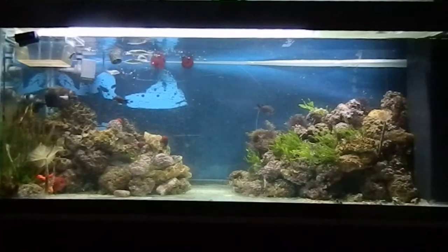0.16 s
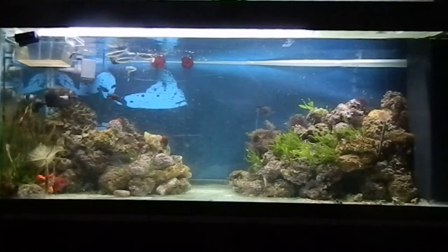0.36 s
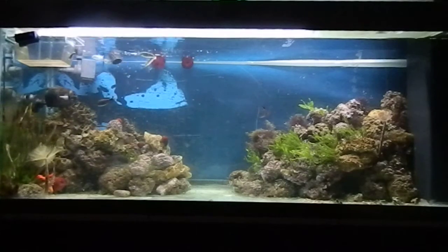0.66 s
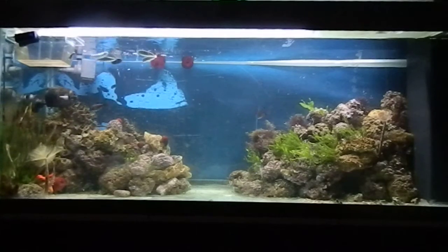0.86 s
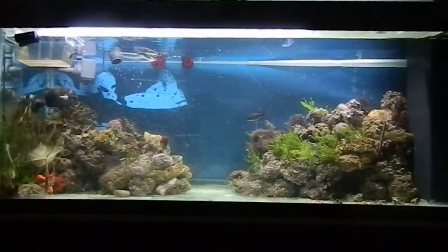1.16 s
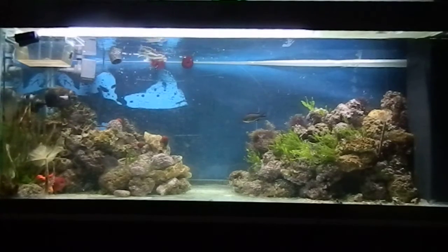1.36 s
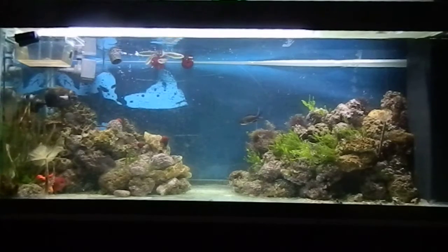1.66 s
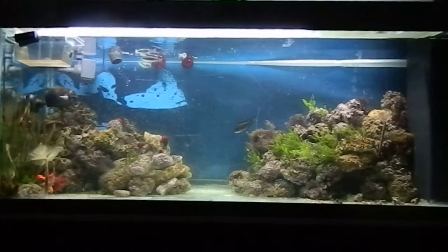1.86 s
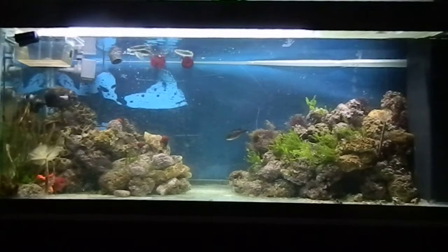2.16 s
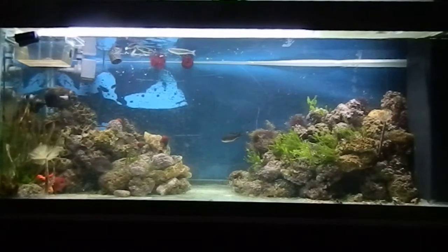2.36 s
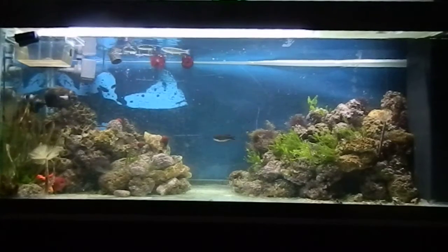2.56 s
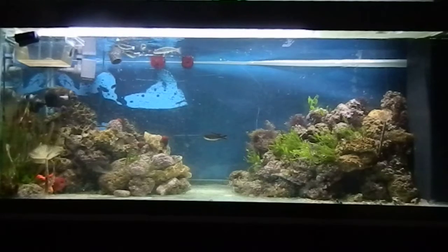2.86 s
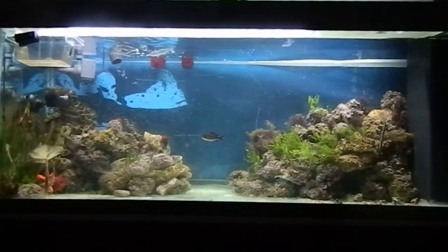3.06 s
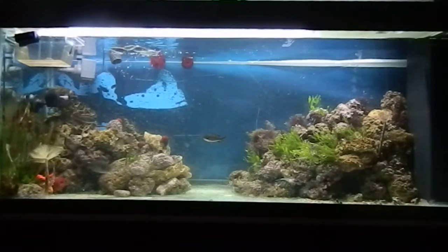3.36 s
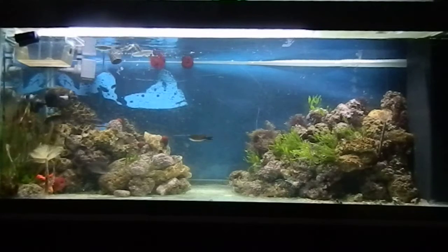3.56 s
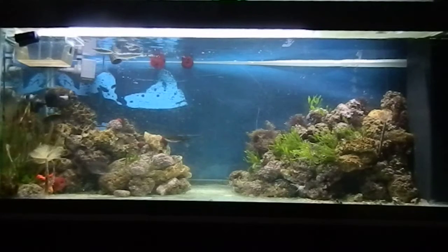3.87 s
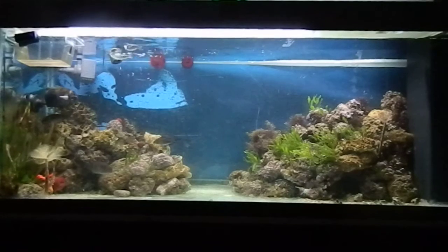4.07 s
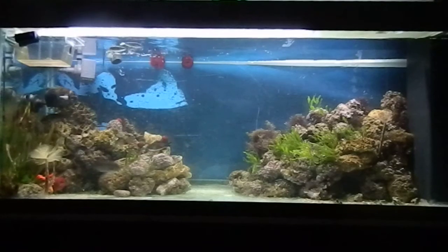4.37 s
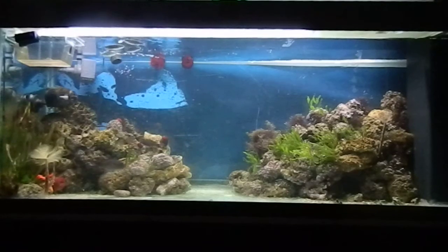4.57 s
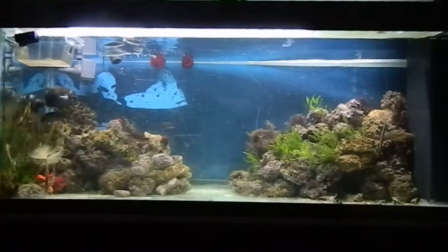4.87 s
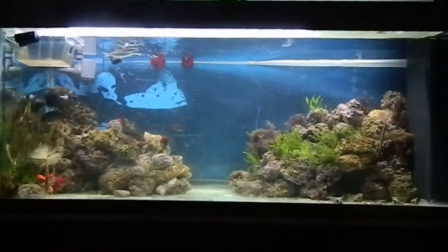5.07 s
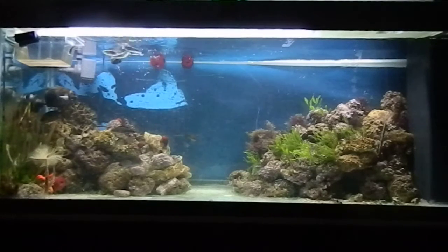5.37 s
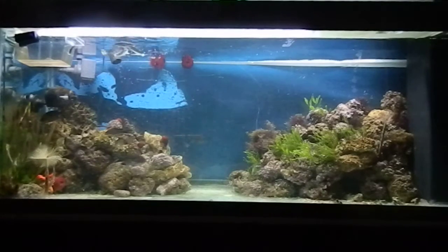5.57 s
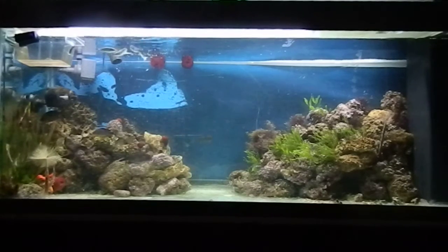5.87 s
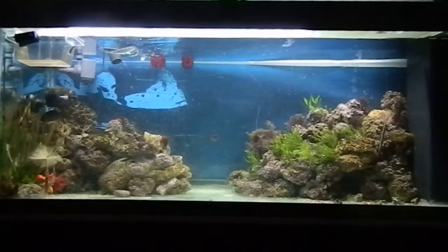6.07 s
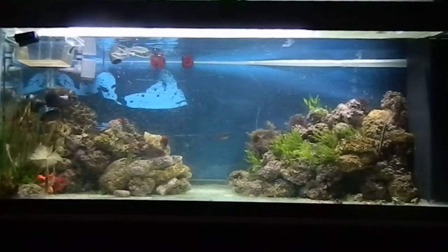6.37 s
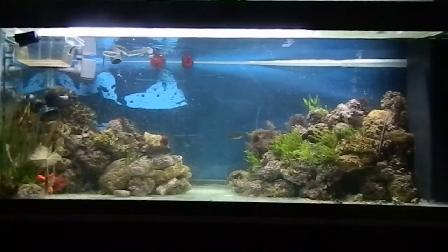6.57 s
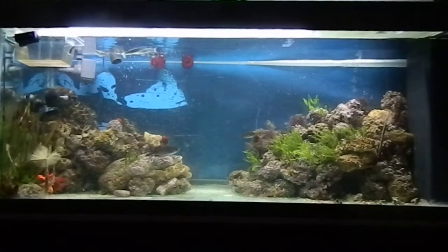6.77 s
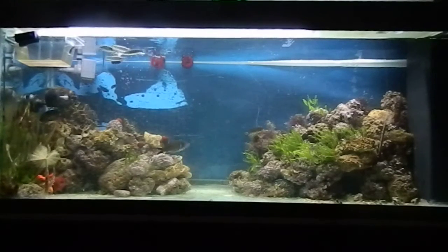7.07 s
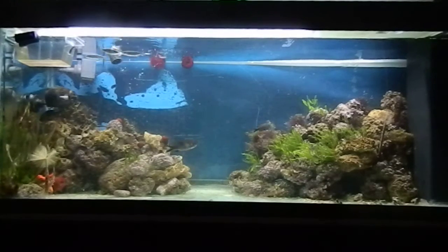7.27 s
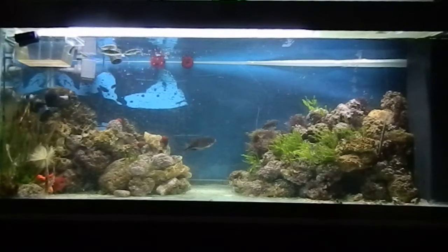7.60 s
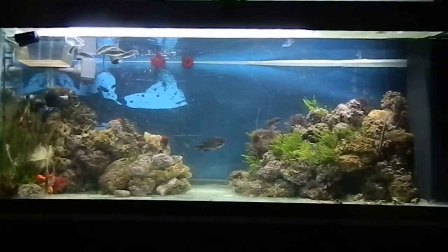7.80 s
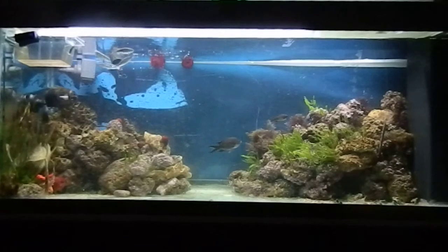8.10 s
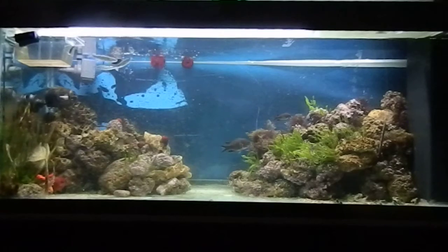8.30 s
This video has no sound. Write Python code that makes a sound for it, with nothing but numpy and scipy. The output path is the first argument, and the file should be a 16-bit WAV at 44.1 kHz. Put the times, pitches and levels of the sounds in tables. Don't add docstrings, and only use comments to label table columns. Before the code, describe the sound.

Close beside aquarium pumps, a strong low mains hum holds constant under quiet watery hiss, tiny valve clicks and a loose cover's late chatter.

```python
import sys
import numpy as np
from scipy import signal
from scipy.fft import rfft, irfft
from scipy.io import wavfile
from scipy.ndimage import uniform_filter1d

SR = 44100
rng = np.random.default_rng(int(sys.argv[2]) if len(sys.argv) > 2 else 0)


def field_ratio(decibels):
    return 10 ** (np.asarray(decibels, dtype=float) / 20)


def dump_mix(stems):
    frames = np.atleast_2d(stems).T
    limited = np.clip(frames, -1, 1)
    pcm = np.round(limited * 32767).astype(np.int16)
    wavfile.write(sys.argv[1], SR, pcm)


N = 372204
T = np.arange(N) / SR
F = np.maximum(np.arange(N // 2 + 1) * SR / N, 1)
MAINS_HZ = 50.005
MAINS_TURN = 2 * np.pi * MAINS_HZ * T


def level(x, db):
    return x * field_ratio(db) / np.sqrt(np.mean(x ** 2))


def over_hz(table):
    hz, value = np.transpose(table)
    return np.interp(np.log(F), np.log(hz), value)


def colour(x, gain):
    return irfft(rfft(x) * gain, N)


def ring(hz, width):
    return 1 / (1 + 1j * (F - hz ** 2 / F) / width)


def walk(rate):
    hold = int(SR / rate)
    steps = np.repeat(rng.standard_normal(N // hold + 1), hold)
    smooth = uniform_filter1d(uniform_filter1d(steps, hold), hold)[:N]
    return (smooth - smooth.mean()) / smooth.std()


def spell(start_s, length_s, attack_s, release_s):
    rise = (T - start_s) / attack_s
    fall = 1 + (start_s + length_s - T) / release_s
    share = np.clip(np.minimum(rise, fall), 0, 1)
    return np.sin(np.pi / 2 * share) ** 2


def clicks(at, size):
    at = np.clip(at, 0, N - 2)
    i = at.astype(int)
    return np.bincount(i, size * (i + 1 - at), N) + np.bincount(i + 1, size * (at - i), N)


def blows(pattern, hz, jitter_s, scatter_db):
    place, db = np.transpose(pattern)
    cycles = np.arange(int(N / SR * hz) - 1)[:, None]
    chance = rng.uniform(-0.95, 1, (len(cycles), len(place), 2))
    at = ((cycles + place) / hz + jitter_s * chance[..., 0]) * SR
    return clicks(at.ravel(), field_ratio(db + scatter_db * chance[..., 1]).ravel())


def puffs(ticks, fade_s):
    fading = signal.lfilter([1], [1, -np.exp(-1 / (fade_s * SR))], ticks)
    return fading * rng.standard_normal(N)


def shaft_repeat(amount, fade_hz):
    g = np.clip(amount, 0, .9) / (1 + (F / fade_hz) ** 4)
    return np.sqrt(1 - g ** 2) / (1 - g * np.exp(-4j * np.pi * F / MAINS_HZ))


def room(x, wet_db, t60_s):
    t = T[:SR // 2]
    tail = rng.standard_normal((2, len(t))) * np.exp(-np.log(1000) * t / t60_s) * (t > .002)
    tail *= field_ratio(wet_db) / np.sqrt(np.sum(tail ** 2, axis=1, keepdims=True))
    tail[[0, 1], [1, 0]] = 1
    return signal.fftconvolve(x[None], tail, axes=1)[:, :N]


def standing_waves(wet_db, t60_s):
    echoes = rng.standard_normal(N) * np.exp(-np.log(1000) * T / t60_s)
    echoes = rfft(echoes / np.sqrt(np.sum(echoes ** 2)))
    return np.abs(1 + field_ratio(wet_db) * echoes / np.sqrt(1 + (1800 / F) ** 4))


# centre in Hz, width in Hz, lift in dB.
CABINET_MODES = [(134, 9.3, 3.5), (229, 12, 3.5), (369, 19.6, 8.5), (429, 7.3, 5.5), (530, 8.7, -1.5),
                 (538, 8.4, 4), (794, 9.5, 3.5), (844, 32, 2.5), (893, 54, 7), (960, 7, 5), (1066, 18, 6.5),
                 (1193, 46, 3.5), (1281, 12, 7.5), (1437.5, 11.7, 10), (1687, 49, 3.5), (2050, 30, 5),
                 (2570, 32, 0.5), (2646, 36, 4), (2750, 50, 3.5), (2850, 45, 1), (3220, 87, 2),
                 (3910, 66, 0.5), (5280, 200, 2), (5810, 170, 4.5), (7350, 730, 2.5), (9300, 2200, 2)]
# centre in Hz, width in Hz, depth from 0 to 1.
ECHO_DIPS = [(3650, 200, .25), (4960, 130, .5), (5520, 130, .5), (6050, 160, .55), (6500, 200, .3),
             (7950, 500, .4)]


def cabinet_response():
    modes = np.prod([1 + (field_ratio(db) - 1) * ring(hz, width) for hz, width, db in CABINET_MODES], axis=0)
    dips = np.prod([1 - depth * ring(hz, width) for hz, width, depth in ECHO_DIPS], axis=0)
    return modes * dips * standing_waves(wet_db=-9, t60_s=.22)


# frequency in Hz, level in dB per Hz.
WATER_SPECTRUM = [(290, -33), (500, -7.5), (680, -6.5), (890, -3), (980, -5.5), (1240, -5.5), (1370, -9.5),
                  (1670, -7.5), (2400, -11.5), (3640, -14), (6000, -21.5), (9300, -26.5), (13200, -34),
                  (15700, -39)]
# frequency in Hz, level in dB per Hz.
AIR_SPECTRUM = [(20, -17), (40, -18), (65, -12), (90, -5.5), (135, -1), (200, -4), (300, -8), (450, -12.5),
                (600, -16), (800, -38)]
# frequency in Hz, likeness from 0 to 1.
PORT_LIKENESS = [(30, .8), (60, 1), (130, 1), (250, 0.53), (400, 0.45), (640, 0.81), (1410, .8),
                 (3100, 0.54), (6820, 0.51), (11000, 0.5), (15000, .05)]


def rush(cabinet):
    water = field_ratio(over_hz(WATER_SPECTRUM) - 1.0) * (F > 400)
    air = field_ratio(over_hz(AIR_SPECTRUM) + 2.0)
    clatter = np.where(F > 210, shaft_repeat(0.29, 2700.0), 1)
    shape = np.hypot(water, air) * np.abs(cabinet) * clatter
    alike = np.clip(over_hz(PORT_LIKENESS), 0, 1)
    out, swell = 0, walk(3.36)
    for octave in np.arange(4.5, 14.1, .5):
        band = np.cos(np.pi * np.clip(np.log2(F) - octave, -.5, .5)) * shape
        mid, side = rfft(rng.standard_normal((2, N)))
        pair = mid * np.sqrt(1 + alike) + side * np.sqrt(1 - alike) * np.array([[1], [-1]])
        out = out + irfft(pair * band, N) * field_ratio(.15 * swell + .5 * walk(12))
    return level(out, -43)


# start in seconds, length in seconds, level in dB.
CLAMP_FITS_HEARD = [
    (-.1, .16, -51),
    (1.75, 0.65, -56.5),
    (3.204, .2, -56.5),
    (6.32, 0.34, -51.5),
]


def clamp():
    pattern = [(.08, -1.5), (.16, -7.5), (.56, -7.5), (.64, -7)]
    ticks = blows(pattern, MAINS_HZ, jitter_s=0.00052, scatter_db=1.5)
    thin = level(colour(puffs(ticks, .002), ring(2760., 620.) ** 2), 0)
    fade_s = 0.084
    fits = sum(field_ratio(db) * spell(s, length, fade_s, fade_s) for s, length, db in CLAMP_FITS_HEARD)
    resting = field_ratio(-60 + 1.0 * walk(2.5))
    return field_ratio(-.8) * room(thin * np.maximum(fits, resting), wet_db=-6, t60_s=.1)


# centre in Hz, width in Hz, level in dB.
COVER_RINGS = [(1087, 21, -5), (1227, 29, -1), (1260, 48, -7), (1377, 60, -3.5), (1447, 47, -12),
               (1610, 120, -7.5), (1815, 62, -5), (2035, 76, -2.5), (2158, 45, -3), (2246, 90, -3)]
# multiple of the mains, level in dB against the buzz.
LOCKED_TONES = [(21, -15), (22, -11), (24, -5.5), (25, -13), (41, -13), (43, -14), (45, -14)]
# peak in seconds, lift in dB, half length in seconds.
COVER_SURGES = [
    (6.866, 3, .09),
    (6.994, 6, 0.13),
    (8.16, 4.5, .08),
]


def cover():
    start_s = 6.74
    going = spell(start_s, T[-1], .1, 1)
    surge_db = sum(db * spell(s - half, half, half, half) for s, db, half in COVER_SURGES)
    buzz_gain = going * field_ratio(-46 + 0.31 * surge_db + 0.74 * walk(8))
    rush_gain = going * field_ratio(-47 - 3 * (T - start_s) + surge_db)

    modes = sum((-1) ** k * field_ratio(db) * ring(hz, width) for k, (hz, width, db) in enumerate(COVER_RINGS))
    knocks = rng.standard_normal((2, N)) * field_ratio(.8 * walk(30))
    buzz = level(colour(knocks[0], modes * shaft_repeat(0.56, 2400.0)), -1.3)
    middle = level(colour(knocks[1], ring(1490.0, 790.0) ** 2 * shaft_repeat(0.28, 2600.)), 0)
    chatter = room(buzz * buzz_gain + middle * rush_gain, wet_db=-7, t60_s=0.21) * field_ratio(0.3)

    settled = spell(7.1, T[-1], .3, 1)
    lines = 0
    for k, db in LOCKED_TONES:
        phase = 2 * np.pi * rng.random() + .25 * walk(4)
        lines = lines + field_ratio(db + 1.3 * walk(5.3)) * np.cos(k * MAINS_TURN + phase)
    return chatter + settled * lines * buzz_gain


# share of the cycle, level in dB.
VALVE_BLOWS = [(.33, 1.5), (.47, 2.5), (.55, -3), (.83, -4), (.97, 2.5), (.06, -6)]
# frequency in Hz, level in dB per Hz.
VALVE_HISS = [(1500, -49), (2500, -23), (3500, -12), (5000, -10.5), (7000, -18), (10000, -18), (12000, -22),
              (15700, -47)]
# time in seconds, peak in dB.
HARD_SLAPS = [(0.2084, -50), (1.4401, -51), (1.9195, -46), (2.1191, -43), (2.1595, -49), (2.2792, -48),
              (2.3196, -49), (2.4683, -49), (2.5282, -45), (2.9292, -43), (3.4291, -45), (3.9085, -44),
              (4.5491, -47), (5.4091, -46), (5.6885, -44), (5.899, -47), (6.0876, -44), (6.4991, -44),
              (6.5789, -42), (7.1082, -43), (7.2883, -43), (7.6286, -47), (7.6685, -44), (8.3888, -43)]


def valve(cabinet):
    ticks = blows(VALVE_BLOWS, MAINS_HZ, jitter_s=.0003, scatter_db=5.5) * field_ratio(0.9 * walk(25))
    spit = level(colour(puffs(ticks, 0.0014), field_ratio(over_hz(VALVE_HISS)) * cabinet), -56.5)
    s, db = np.transpose(HARD_SLAPS)
    slaps = colour(puffs(clicks(s * SR, field_ratio(db + 9)), 0.00069), ring(10200.0, 3500.) ** 2)
    return room(spit + slaps, wet_db=-8, t60_s=0.13)


# start in seconds, length in seconds.
CASING_TOUCHES = [
    (2.65, 3.1),
    (7.25, 1.5),
]
# start in seconds, length in seconds.
CASING_ROCK = (3.8, .6)
# multiple of the mains, touching level in dB, free level in dB.
CASING_TONES = [(6, -61, -70), (7, -59.5, -65.5), (8, -60.5, -71)]
# multiple of the mains, rms level in dB.
MAINS_OVERTONES = [(3, -58.5), (5, -68.5), (9, -66.5), (10, -66), (11, -70.5), (12, -71.5), (13, -70.5),
                   (18, -66.5), (24, -66), (34, -69)]
# frequency in Hz, rms level in dB.
SHAFT_TONES = [(40.62, -55), (44.75, -75), (48.88, -68), (53.12, -58), (87.5, -68), (293.5, -70)]


def hum():
    fade_s = .3
    touch = sum(spell(s, length, fade_s, fade_s) for s, length in CASING_TOUCHES)
    rock = spell(*CASING_ROCK, fade_s, fade_s)
    main_gain = field_ratio(-27.8 - .3 * touch + 0.16 * walk(6))

    grown = spell(1.43, T[-1], 1.2, 1) * field_ratio(-48.5 - 3 * (1.5 - touch))
    octave_gain = (field_ratio(-63) + grown) * field_ratio(.6 * walk(3))
    out = main_gain * np.cos(2 * MAINS_TURN + 3.82) + octave_gain * np.cos(4 * MAINS_TURN + 0.68)

    for k, touching_db, free_db in CASING_TONES:
        contact = touch - round(k) % 2 * rock
        gain = field_ratio(free_db + (touching_db - free_db) * contact + 2.0 * walk(1.46))
        out += gain * np.cos(round(k) * MAINS_TURN + 0.4 * walk(1.18) + 2 * np.pi * rng.random())
    for k, db in MAINS_OVERTONES:
        phase = 0.33 * walk(1.22) + 2 * np.pi * rng.random()
        out += field_ratio(db + 3.3 * walk(1.576)) * np.cos(round(k) * MAINS_TURN + phase)
    for hz, db in SHAFT_TONES:
        phase = 2 * np.pi * rng.random() + 0.24 * walk(0.71)
        out += field_ratio(db + 0.23 * walk(1.7)) * np.cos(2 * np.pi * hz * T + phase)
    return np.sqrt(2) * out


def scene():
    cabinet = cabinet_response()
    return rush(cabinet) + clamp() + cover() + valve(cabinet) + hum()


def top_cut(x):
    return signal.sosfilt(signal.butter(12, 15730, fs=SR, output="sos"), x)


# frequency in Hz, left minus right in dB.
PORT_LEAN = [(60, 3.7), (110, 3.8), (200, 3.5), (380, 3.2), (700, 2.9), (1290, 2.2), (2380, .4),
             (4400, -.3), (8120, .5), (15000, .6)]


def record(dry):
    lean = field_ratio(over_hz(PORT_LEAN) / 2 * np.array([[1], [-1]]))
    return top_cut(colour(dry, lean))


dry = scene()
out = record(dry)
dump_mix(out)
```